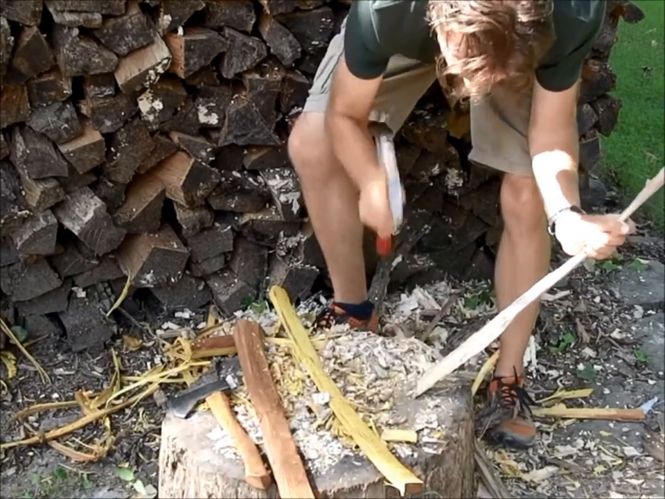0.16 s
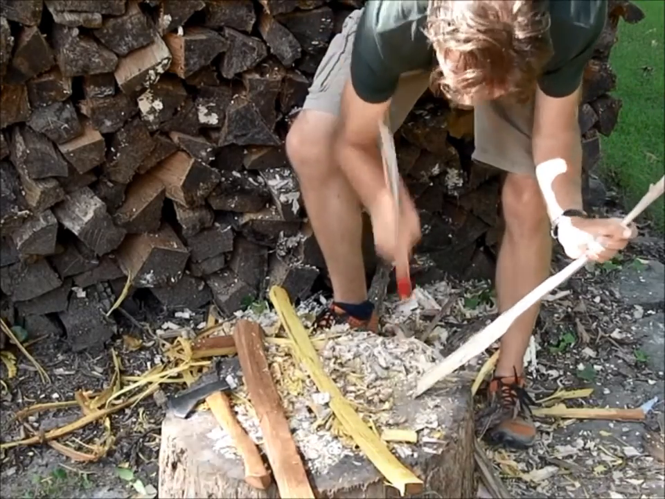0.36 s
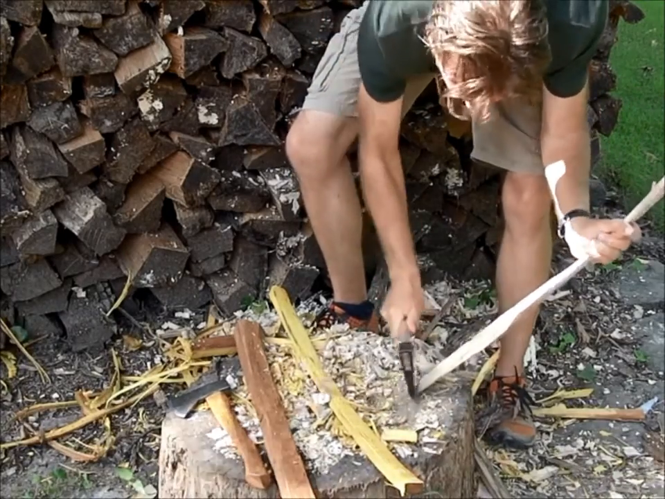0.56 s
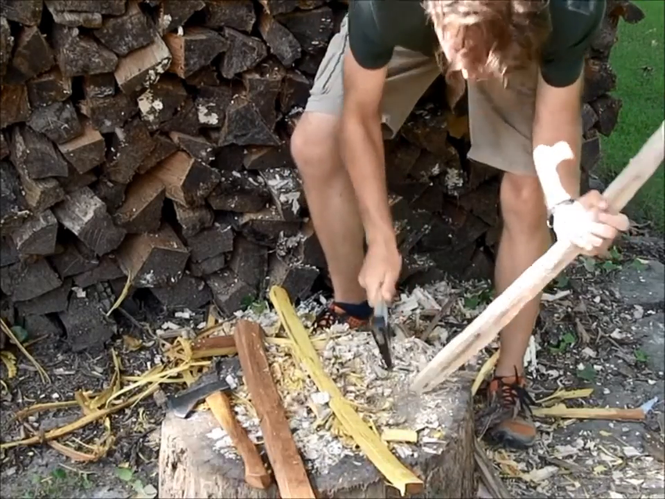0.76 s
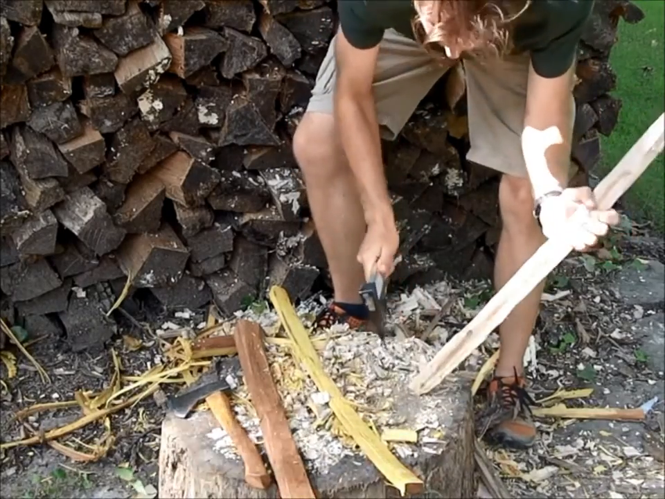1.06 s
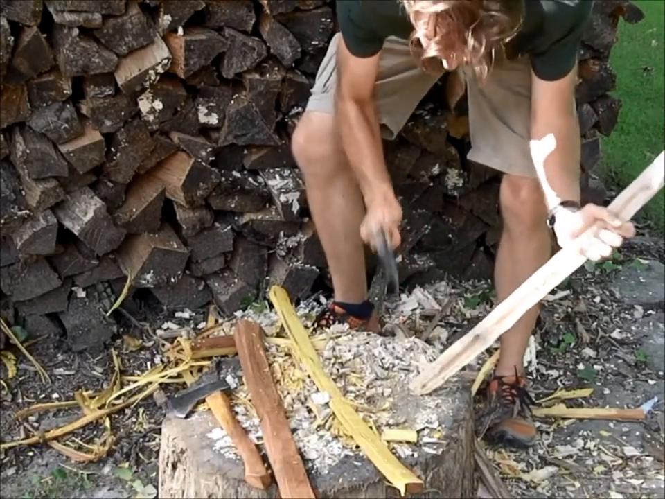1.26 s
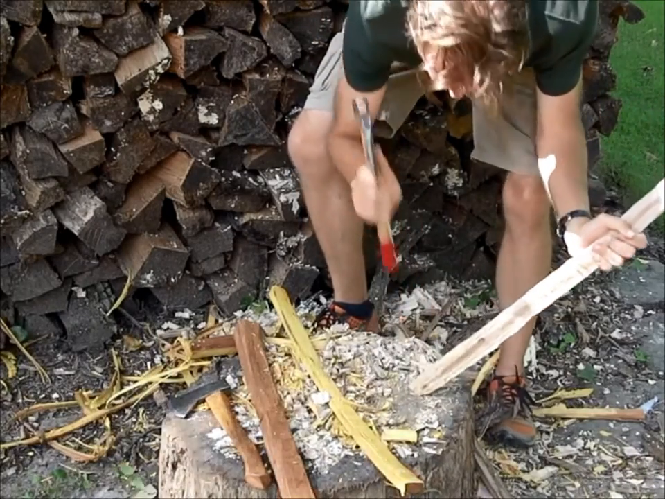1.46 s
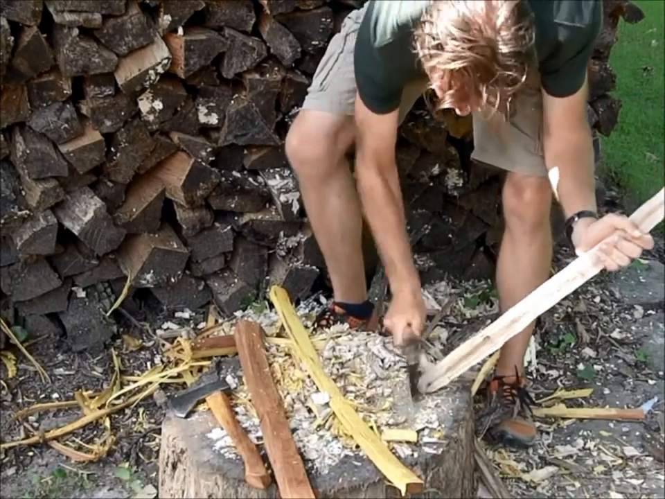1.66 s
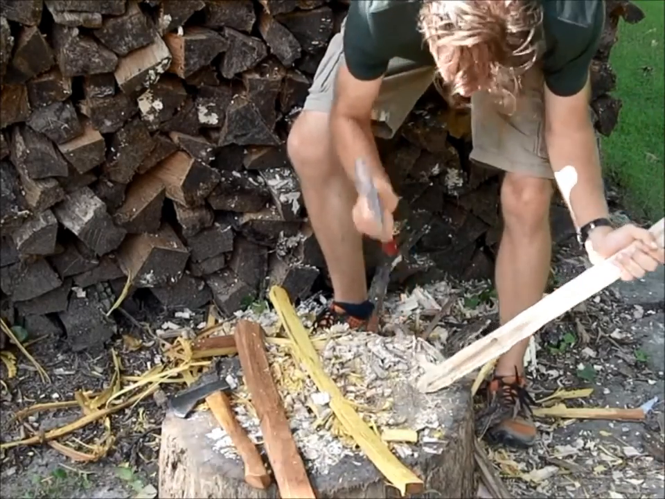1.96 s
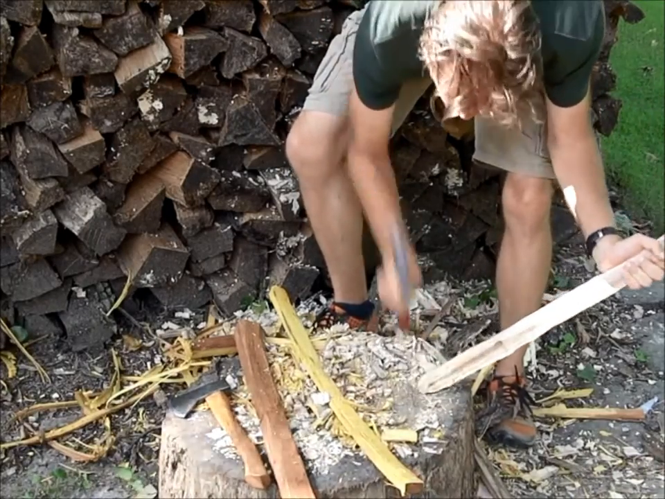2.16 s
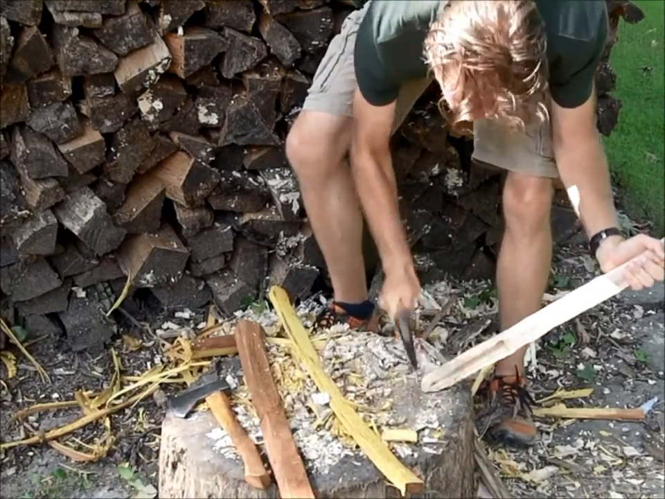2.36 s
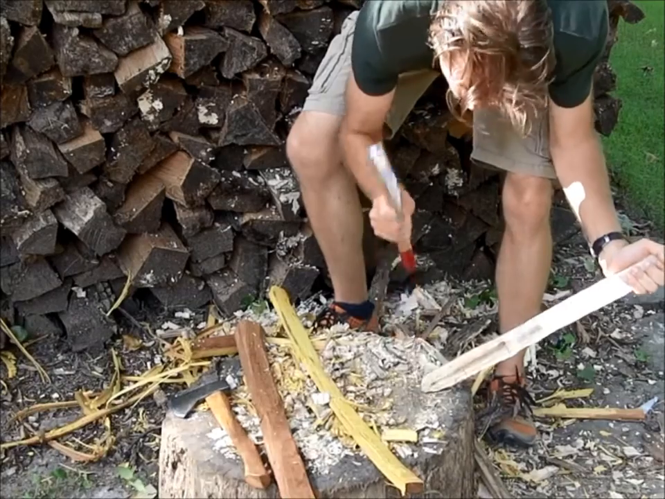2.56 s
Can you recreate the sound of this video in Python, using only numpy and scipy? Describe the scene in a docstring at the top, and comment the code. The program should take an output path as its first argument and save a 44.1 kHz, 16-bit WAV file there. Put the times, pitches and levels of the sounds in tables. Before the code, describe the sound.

A hatchet chops a thin wooden slat three times while wind buffets the microphone.

```python
"""A hatchet bites three times into a thin slat resting on a stump, in front of a wood pile.
Each chop is a crack of snapping fibres that rings the slat and the steel head, then a knock on the
stump and a short yard echo. Chips tick, and a faint double echo trails the last blow. Over a soft
outdoor hush, a dying breeze buffets the right port of a small microphone, which overloads on the
hardest puffs and widens its stereo by taking a little of each port out of the other."""
import sys
import numpy as np
from scipy import signal
from scipy.io import wavfile
from scipy.ndimage import uniform_filter1d

SR = 44100
rng = np.random.default_rng(int(sys.argv[2]) if len(sys.argv) > 2 else 0)


def digitize_waveform(pressure):
    """Quantize a signal to 16-bit integers and store it at the path in sys.argv[1].

    Rows of a 2-D input are taken as channels; values are limited to [-1, 1].
    """
    field = np.atleast_2d(pressure).T
    bounded = np.clip(field, -1, 1)
    quanta = np.round(bounded * 32767).astype(np.int16)
    wavfile.write(sys.argv[1], SR, quanta)


N = 119070

# tone of the distant hush: freq_hz, level_db
HUSH_TONE = [(30, -15), (100, -4.5), (300, 5), (700, -3.5), (1500, -6), (5000, -4), (16000, -4.5)]
# how alike the hush is at the two ports: freq_hz, correlation
HUSH_LIKENESS = [(60, .6), (200, 1), (700, 0.61), (1500, 0.087), (4000, 0.017), (15000, 0.091)]
# fader ride on the hush: time_s, level_db
HUSH_RIDE = [(0, -38.5), (.3, -41.5), (1.0, -44), (1.9, -44.5), (2.7, -42)]
# tone of calm wind on the right port: freq_hz, level_db
CALM_TONE = [(20, -26), (45, -7.5), (80, 0), (130, 0.5), (200, -4), (300, -14), (500, -34.5), (900, -63.5),
             (2500, -110)]
# tilt that brightens the wind: freq_hz, gain_db_per_db
GUST_TILT = [(20, -0.4), (120, -0.53), (250, .5), (500, 1), (1000, 1.4356)]
# fader ride on the steady breeze: time_s, level_db
BREEZE_RIDE = [(0, -10.5), (.3, -32), (.6, -20), (1.0, -25.5), (1.4, -25), (1.7, -25), (2.0, -32),
               (2.3, -37), (2.45, -52), (2.7, -41)]
# gusts on the right port: start_s, length_s, level_db, brightness_db
GUST_CUES = [(-.02, 0.1, -21.5, 14), (0.108, 0.1, -17, -4), (0.346, 0.015, -22.5, -6),
             (0.39, 0.0088, -18.5, 10), (0.431, 0.025, -12, 17.5), (0.481, 0.045, -13.5, 15.5),
             (0.51, 0.097, -16, 17.5), (0.613, .13, -15, 16.5), (0.767, 0.061, -20.5, 24),
             (0.864, .11, -17, 16), (0.986, 0.072, -18, 12.5), (1.112, 0.059, -12, 17),
             (1.165, 0.12, -13.5, 16.5), (1.311, 0.1, -15, 15.5), (1.421, 0.079, -21.5, 6.5),
             (1.545, 0.1, -26, 14.5), (1.794, 0.014, -32, -6), (2.14, 0.034, -32, -24)]
# tone of the rumble at the sheltered left port: freq_hz, level_db
LEE_TONE = [(20, -48), (45, -10.5), (80, -6), (150, -28.5), (300, -32), (600, -33.5), (2000, -96)]
# fader ride on that rumble: time_s, level_db
LEE_RIDE = [(0, -33.5), (.3, -42.5), (.5, -37), (.7, -37), (1.2, -45), (2.0, -40.5), (2.7, -42.5)]
# dry ticks of chips: start_s, level_db, pitch_hz
CHIP_CUES = [(0.0761, -32.5, 10900), (.691, -15.5, 1380), (1.944, -34.5, 11600), (2.1126, -39.5, 12400)]
# single hard puffs on the right port: centre_s, level_db, pitch_hz
BUFFET_CUES = [(0.491, -21, 284), (0.519, -1, 300), (0.67, -0.5, 293), (0.687, -15.5, 380),
               (0.907, -12, 400), (0.939, -5, 370), (0.965, -4.5, 310), (.995, -10.5, 284),
               (1.037, -16, 283), (1.133, -5, 330), (1.218, -6, 410), (1.265, -7.5, 360), (1.317, -8, 384),
               (1.333, -12, 378), (1.352, -14, 433), (1.379, -12, 288), (1.396, -1, 335)]
# hatchet blows: start_s, level_db, crack_s, pitch_hz, body_db, treble_db, hiss_db, slat_db,
# stump_db, knock_delay_s, echo_db, far_echo_db
CHOP_CUES = [(0.526, -2.5, 0.0037, 2270, -7.5, 20, -1, -17, -2.5, 0.0035, -13.5, 4.5),
             (1.6746, -5, 0.0056, 1300, 2.5, 15, -0.5, -3, 7, 0.0050, -13.5, 0),
             (2.2917, -2, 0.005, 2100, 1, 6.5, -33, 1, 0.5, 0.0049, -14.5, 2)]
# tone of cracking wood: freq_hz, level_db
CRACK_TONE = [(120, -20), (220, -1), (400, -14.5), (800, 0.5), (1500, 3), (2500, -5), (4000, -3.5),
              (5200, -1), (6500, 1), (9000, -16), (12500, -16.5), (14500, -12.5)]
# ring of the thin slat: pitch_hz, level_db, t60_s
SLAT_MODES = [(789, -4, 0.046), (950, -3.5, 0.011), (1256, -9.5, .025), (1542, -18, 0.054),
              (1660, 2.5, 0.038), (1927, -27, 0.017), (2100, -11, 0.024), (2610, 6.5, 0.0098)]
# ring of the steel head: pitch_hz, level_db, t60_s
HEAD_MODES = [(2165, 0, .07), (3660, -4, .07), (3770, -6, .06), (10400, 4, .03), (11600, 0, .03)]
# knock of the stump: pitch_hz, level_db, t60_s
STUMP_MODES = [(239, -4, 0.072), (295, 5, 0.041), (418, 2.5, 0.039), (604.6, 1, 0.035), (720, -8, 0.018)]
# where the chop sits in the stereo image: freq_hz, left_over_right_db
CHOP_BALANCE = [(200, -6.5), (700, -4), (1300, -3.5), (2400, -6), (4400, 7), (8000, 5), (15000, 5.5)]
# decay of the yard's echo: freq_hz, t60_s
YARD_DECAY = [(250, 0.62), (700, 0.83), (1500, 0.5), (4000, 1), (7000, 0.9), (14000, 0.99)]
# snaps of the overloading right port: start_s, level_db
OVERLOAD_CUES = [(.938, -28), (0.965, -29), (1.133, -27.5), (1.395, -34)]
# tone of those snaps: freq_hz, level_db
OVERLOAD_TONE = [(500, 3), (1200, -3.5), (2200, -12), (5000, -23.5), (16000, -23)]
# faint double late echo of the last chop: start_s, level_db
LATE_ECHO_CUES = [(2.349, -46), (2.368, -44.5)]
# colour of the microphone housing: freq_hz, gain_db
HOUSING_EQ = [(100, -11.5), (900, 2), (1600, 4), (2200, 3), (2600, -2), (2880, -12), (3150, -1), (3650, 1),
              (4300, -3.5), (4950, -12), (5300, -9.5), (6500, -15.5), (8800, -14), (10300, -11.5),
              (11500, -13.5), (13500, -13.5), (15500, -19)]

TIME = np.arange(N) / SR


def amp(db):
    return 10 ** (np.asarray(db) / 20)


def unit_rms(x):
    return x / np.sqrt(np.mean(x ** 2) + 1e-20)


def at_hz(points, hz):
    freqs, values = np.transpose(points)
    return np.interp(np.log(hz + 1), np.log(freqs + 1), values)


def ride(points):
    return amp(np.interp(TIME, *np.transpose(points)))


def bell(hz, centre_hz, octaves):
    return np.exp(-(np.log2((hz + 1) / centre_hz) / octaves) ** 2)


def smooth(x, span_s):
    return uniform_filter1d(x, round(span_s * SR))


def add(mix, start_s, sound):
    part = mix[..., round(start_s * SR):][..., :sound.shape[-1]]
    part += sound[..., :part.shape[-1]]


def eq(x, db_of_hz):
    """Minimum-phase EQ, so nothing rings ahead of an attack."""
    db = db_of_hz(abs(np.fft.fftfreq(4096, 1 / SR)))
    taps = np.fft.ifft(np.exp(np.conj(signal.hilbert(db * np.log(10) / 20)))).real[:2048]
    return signal.oaconvolve(x, taps.reshape((1,) * (x.ndim - 1) + (-1,)), axes=-1)[..., :x.shape[-1]]


def noise(db_of_hz, likeness=0):
    """Two channels of steady coloured noise, correlated by likeness."""
    hz = np.fft.rfftfreq(1024, 1 / SR)[:, None]
    a, b, c, d = rng.standard_normal((N // 128 + 5, 513, 4)).T
    left = a + 1j * b
    right = likeness * left + np.sqrt(1 - likeness ** 2) * (c + 1j * d)
    spectra = np.array([left, right]) * amp(db_of_hz(hz))
    return signal.istft(spectra, nperseg=1024, noverlap=896)[1][:, :N]


def outdoor_hush():
    """A bed of distant air, centred in the lows and wide on top."""
    likeness = np.clip(at_hz(HUSH_LIKENESS, np.fft.rfftfreq(1024, 1 / SR)), 0, 1)[:, None]
    hush = noise(lambda hz: at_hz(HUSH_TONE, hz), likeness)
    return unit_rms(hush) * ride(HUSH_RIDE) * amp(3)


def breeze():
    """Lumpy turbulence on the right port; gusts swell it with a blend of calm and bright wind."""
    edge_s, lump_s, lump_db = 0.0039, 0.0092, 3.5
    calm = unit_rms(noise(lambda hz: at_hz(CALM_TONE, hz))[0])
    bright = unit_rms(noise(lambda hz: at_hz(CALM_TONE, hz) + 20 * at_hz(GUST_TILT, hz))[0])
    lumps = unit_rms(smooth(smooth(rng.standard_normal(N), lump_s), lump_s))
    wind = calm * ride(BREEZE_RIDE)
    for start_s, length_s, level_db, brightness_db in GUST_CUES:
        inside_s = np.minimum(TIME - start_s, start_s + length_s - TIME)
        swell = np.clip(inside_s / edge_s / 2 + .5, 0, 1) ** 2
        blend = np.clip(amp(brightness_db - 18), 0, 1)
        wind += amp(level_db) * swell * (np.sqrt(1 - blend ** 2) * calm + blend * bright)
    return wind * unit_rms(amp(lump_db * lumps))


def lee_rumble():
    """The sheltered left port catches only a soft rumble of wind."""
    return unit_rms(noise(lambda hz: at_hz(LEE_TONE, hz))[0]) * ride(LEE_RIDE)


def chip_ticks():
    """Chips land as tiny dry noise bursts, each levelled against the housing's colour at its pitch."""
    decay_s, skirt_db = .004, -9
    out, t = np.zeros((2, N)), np.arange(0, .03, 1 / SR)
    for start_s, level_db, pitch_hz in CHIP_CUES:
        burst = rng.standard_normal((2, len(t))) * np.exp(-t / decay_s)
        tick = eq(burst, lambda hz: skirt_db * (1 - bell(hz, pitch_hz, octaves=0.47)))
        add(out, start_s, amp(level_db - at_hz(HOUSING_EQ, pitch_hz)) * tick)
    return out


def buffets():
    """Hard puffs thump the right port, each a single push and pull of pressure."""
    half_s, width_cycles = 600 / SR, 0.36
    out = np.zeros(N)
    for centre_s, level_db, pitch_hz in BUFFET_CUES:
        cycles = (TIME[:1200] - half_s) * pitch_hz
        thump = np.sin(2 * np.pi * cycles) * np.exp(-(cycles / width_cycles) ** 2)
        add(out, centre_s - half_s, rng.choice([-1, 1]) * amp(level_db + 1.5) * thump)
    return out


def ring(modes, t):
    """One blow on a set of modes, slightly detuned by where it lands."""
    return sum(amp(db - 60 * t / t60_s) * np.sin(2 * np.pi * hz * rng.uniform(0.988, 1.0068) * t)
               for hz, db, t60_s in modes)


def chop(level_db, crack_s, pitch_hz, body_db, treble_db, hiss_db, slat_db, stump_db, knock_delay_s):
    """Fibres snap, slat and head ring, the slat knocks the stump. Gives direct sound and echo send."""
    snaps_per_s, fade_s = 740, 0.0014
    t = np.arange(0, .12, 1 / SR)
    envelope = np.exp(-np.maximum(t - crack_s, 0) / fade_s)
    fibres = rng.standard_normal(len(t)) * envelope
    fibres *= 0.18 + (rng.random(len(t)) < snaps_per_s / SR)  # sparse spikes over a low fizz
    fibres[0] = .7  # the edge makes contact
    fibres /= np.sqrt(np.mean(fibres[t < crack_s] ** 2))
    impulse = (t == 0) * np.linalg.norm(fibres)  # the same energy in one click

    def tone(hz):
        return (at_hz(CRACK_TONE, hz) + 4 * bell(hz, pitch_hz, octaves=.2)
                + body_db * bell(hz, 1180, octaves=0.65)
                + hiss_db * bell(hz, 5600, octaves=0.23)
                + treble_db * bell(hz, 10970, octaves=0.21))

    crack, click = eq(np.array([fibres, impulse]), tone)
    slat = amp(slat_db - 30) * signal.oaconvolve(fibres, ring(SLAT_MODES, t))[:len(t)]
    head = amp(treble_db - 34) * ring(HEAD_MODES, t)
    knock = amp(stump_db - 9.5) * ring(STUMP_MODES, np.maximum(t - knock_delay_s, 0))
    return amp(level_db) * np.array([crack + slat + head + knock, click + 0.23 * head + knock])


def hatchet():
    """The chops reach the left port a touch later than the right, with the yard answering each."""
    lag_s = 0.0001
    out = np.zeros((2, N))
    for start_s, *blow, echo_db, far_echo_db in CHOP_CUES:
        right, send = np.pad(chop(*blow), ((0, 0), (0, SR // 2)))
        samples = np.arange(len(right))
        late = np.interp(samples - lag_s * SR, samples, right)
        left = eq(late, lambda hz: at_hz(CHOP_BALANCE, hz))
        echo = amp(echo_db) * yard_echo(send, far_echo_db)[:, :len(right)]
        add(out, start_s, np.array([left, right]) + echo)
    return out


def yard_echo(send, far_db):
    """Quick clatter off stump and ground, a slap off the wood pile, and a far tail dying band by band."""
    near_t60_s, near_db = 0.034, 3.5
    pile_s, pile_spread_s, pile_db = 0.035, 0.0096, -5.5
    grain_db, dull_hz, dull_db_per_octave = 2.5, 5430, -7
    t = np.arange(SR // 2) / SR
    scatter = rng.standard_normal((2, len(t))) * (t > .004)
    grain = unit_rms(smooth(rng.standard_normal(len(t)), span_s=.002))
    scatter *= amp(grain_db * grain)  # splinters and small rebounds roughen the echoes
    scatter[1] = .5 * scatter[0] + 0.61 * scatter[1]  # the ports hear partly the same echoes
    band_hz, frame_s, bands = signal.stft(scatter, SR, nperseg=256)
    decay = amp(-60 * frame_s / at_hz(YARD_DECAY, band_hz)[:, None])
    far = signal.istft(bands * decay, SR, nperseg=256)[1][:, :len(t)]
    near = scatter[::-1] * amp(-60 * t / near_t60_s)
    slap = scatter * np.exp(-((t - pile_s) / pile_spread_s) ** 2)
    response = sum(amp(db) * layer / np.linalg.norm(layer[0])
                   for db, layer in [(far_db, far), (near_db, near), (pile_db, slap)])
    response = eq(response, lambda hz: dull_db_per_octave * np.log2(1 + (hz / dull_hz) ** 4) / 4)
    return signal.fftconvolve(send[None], response, axes=1)


def overload_snaps():
    """Short snaps of the right port overloading, cued on four of the hard puffs."""
    decay_s = 0.00098
    clicks = np.zeros(N)
    for start_s, level_db in OVERLOAD_CUES:
        burst = rng.standard_normal(400) * np.exp(-TIME[:400] / decay_s)
        add(clicks, start_s, amp(level_db + 20.5) * burst)
    return eq(clicks, lambda hz: at_hz(OVERLOAD_TONE, hz))


def late_echoes():
    """A faint double late echo of the last chop: two noise bursts in the crack's tone, dead centre."""
    decay_s = 0.0067
    out, t = np.zeros((2, N)), np.arange(0, .03, 1 / SR)
    for start_s, level_db in LATE_ECHO_CUES:
        burst = rng.standard_normal(len(t)) * np.exp(-t / decay_s)
        echo = eq(burst, lambda hz: at_hz(CRACK_TONE, hz))
        add(out, start_s, amp(level_db) * unit_rms(echo))
    return out


def scene():
    """Airborne sound takes the housing's colour; wind hits the ports directly and clips on the right."""
    overload = .7
    airborne = hatchet() + late_echoes() + chip_ticks() + outdoor_hush()
    windward = np.clip(breeze() + buffets(), -overload, overload)
    wind = np.array([lee_rumble(), windward + overload_snaps()])
    return eq(airborne, lambda hz: at_hz(HOUSING_EQ, hz)) + wind


def record(dry):
    """The microphone chain: stereo widening, a soft ceiling, a faint wavering whine and a top cut."""
    widen, widen_hz, ceiling, top_hz = 0.5, 840, 1.1, 15880
    whine_hz, whine_db, waver_db = 15734, -70, 2.5
    opposite_highs = signal.lfilter(*signal.butter(1, widen_hz, "high", fs=SR), dry[::-1])
    wide = dry - widen * opposite_highs
    limited = wide / (1 + abs(wide / ceiling) ** 4) ** .25
    waver = unit_rms(smooth(rng.standard_normal(N), span_s=.025))
    whine = amp(whine_db + waver_db * waver) * np.sin(2 * np.pi * whine_hz * TIME)
    top_cut = signal.firwin(511, top_hz, window=("kaiser", 9), fs=SR)
    return signal.oaconvolve(limited + whine, top_cut[None], "same")


dry = scene()
out = record(dry)
digitize_waveform(out)
```